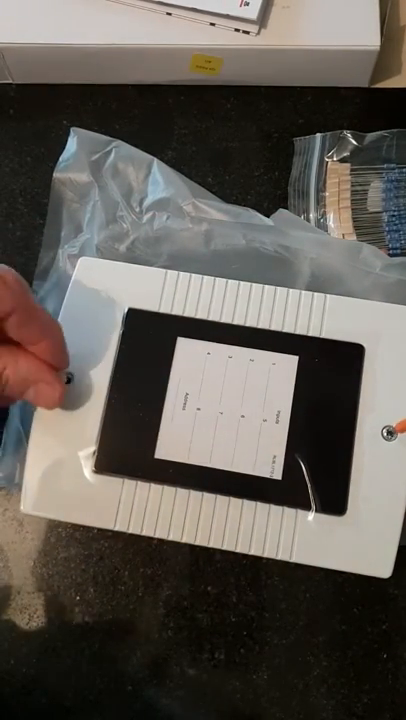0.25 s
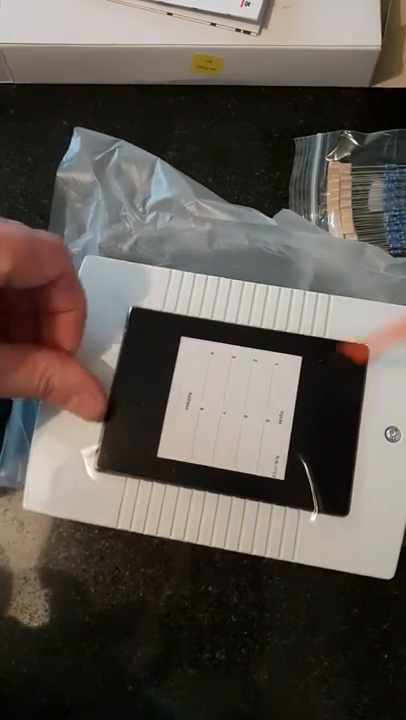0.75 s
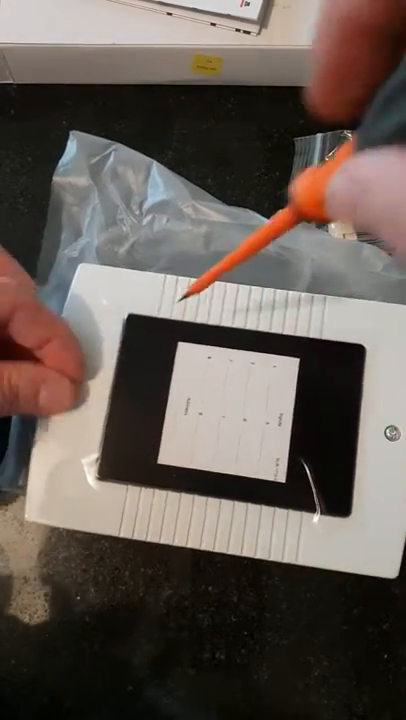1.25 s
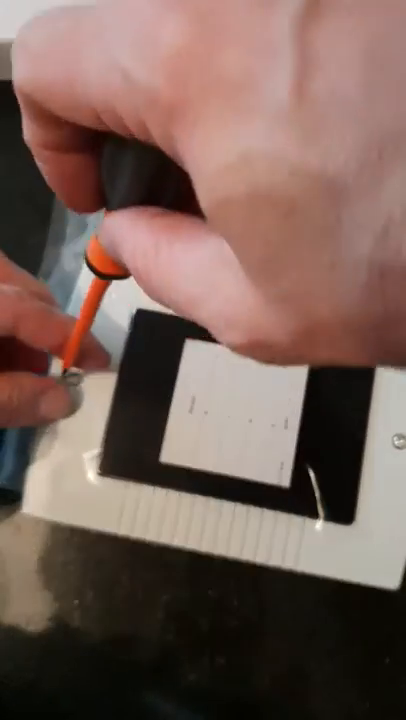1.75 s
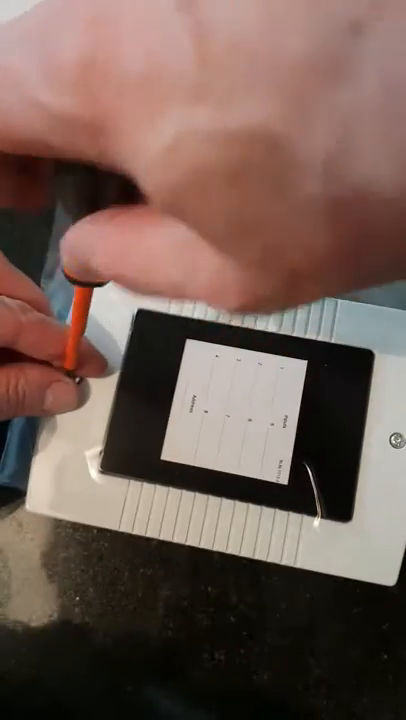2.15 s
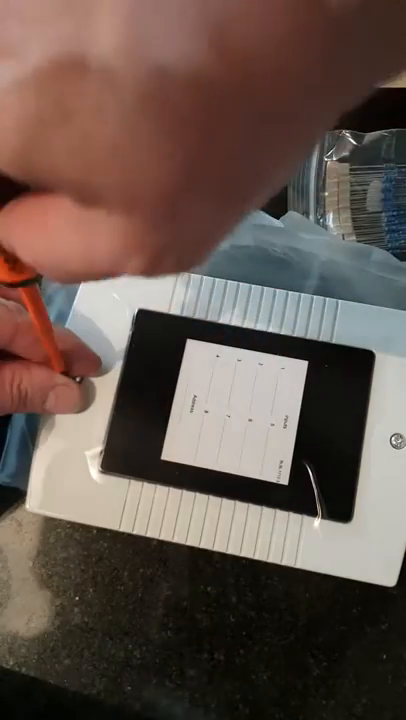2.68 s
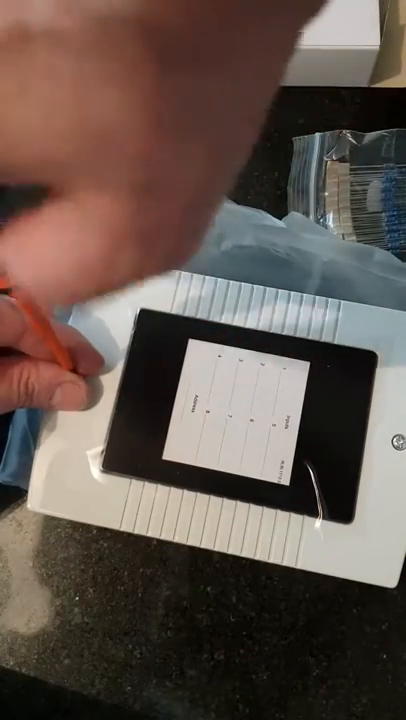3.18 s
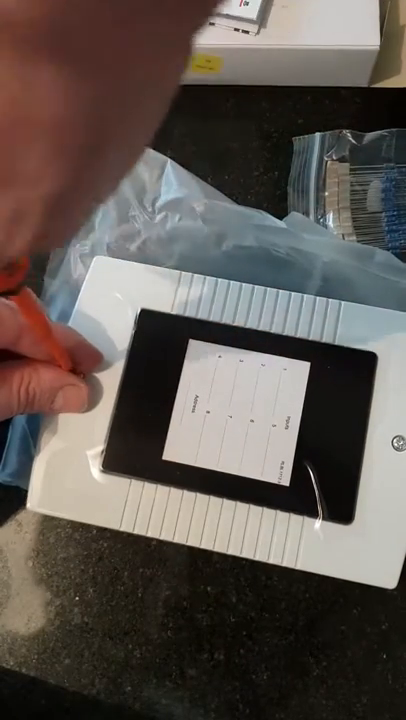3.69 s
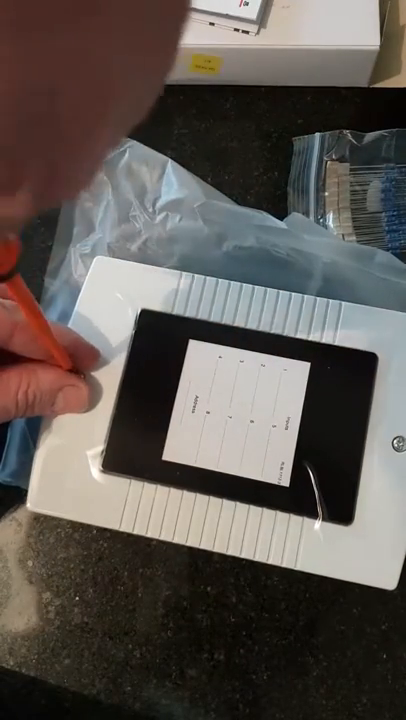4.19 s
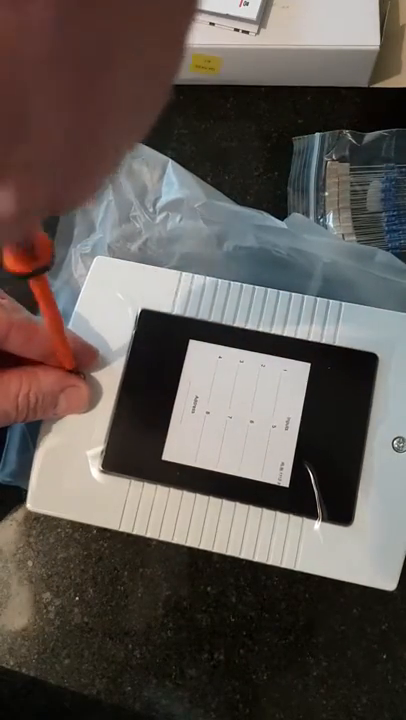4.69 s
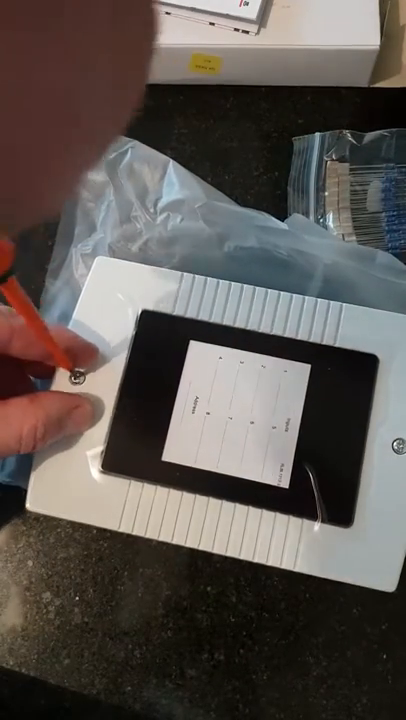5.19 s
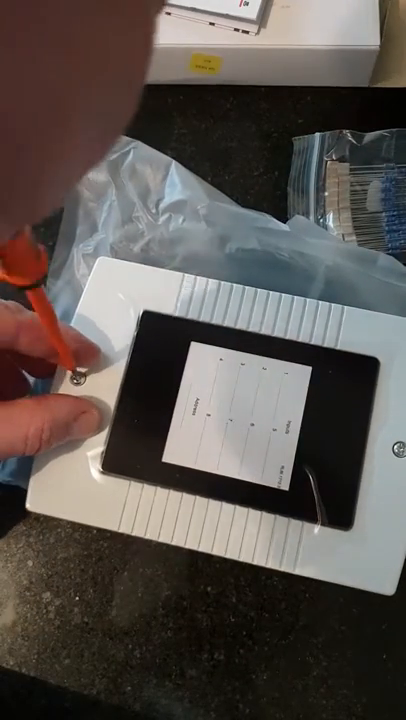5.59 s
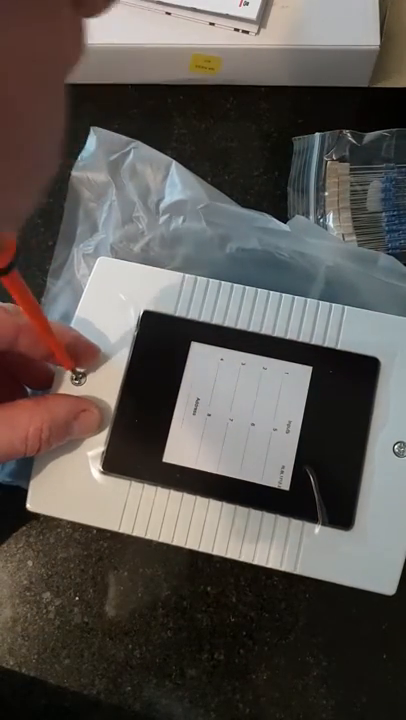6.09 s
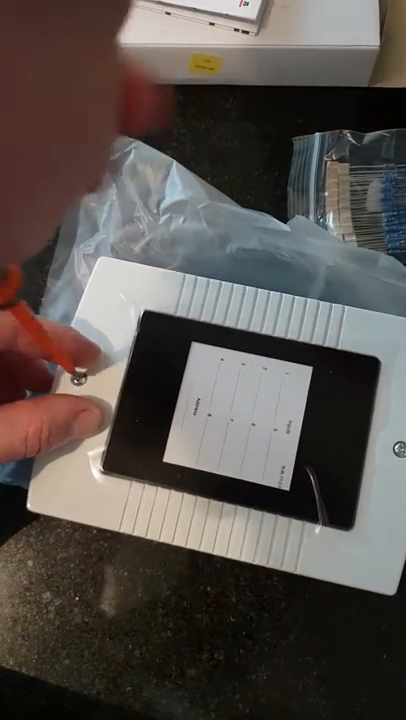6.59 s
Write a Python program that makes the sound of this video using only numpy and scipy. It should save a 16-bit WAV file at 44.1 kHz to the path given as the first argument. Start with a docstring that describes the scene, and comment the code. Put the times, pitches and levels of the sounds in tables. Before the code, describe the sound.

A small screw is driven by hand into a hollow plastic housing, heard close by in a small hard room over faint air noise and a low hum. For the first 0.7 seconds the screw taps lightly on the shell. From about 0.9 to 1.4 seconds the screwdriver is taken up with sharper clicks and tiny metallic pings, while the steadying hand bumps the housing softly. A few more ticks and brief finger slides on the handle follow. Near 2.5 seconds the tip slips off and lands with a knock, the loudest sound, then scrapes faintly and clicks back into the screw head around 3 seconds. After a lull, eight twists run from 3.9 to 6.6 seconds, settling at about three a second, each with small catch and release clicks and a slight hollow ring. The strongest comes near 5.4 seconds. A last twist begins at about 6.8 seconds.

```python
"""A small screw is driven by hand into a plastic housing on a stone worktop, close by in a small hard room.
Over faint air noise and hum, screw and screwdriver tap the shell: each contact cracks and knocks it.
Near 2.5 s the tip slips off, lands with a loud knock and scrapes back into the screw head.
From 3.9 s it clicks through eight twists (catch, seat, release), the housing ringing; a last one begins.
Throughout, fingers slide on the handle now and then and the steadying hand bumps the housing softly."""
import sys
import numpy as np
from scipy import signal
from scipy.fft import rfft, irfft
from scipy.io import wavfile
from scipy.ndimage import uniform_filter1d

SR = 44100
rng = np.random.default_rng(int(sys.argv[2]) if len(sys.argv) > 2 else 0)


def log_audio(samples):
    """Write samples as a 16-bit WAV file to the path given in sys.argv[1]."""
    # one column per channel
    frames = np.atleast_2d(samples).T
    # limit to full scale, then quantise
    limited = np.clip(frames, -1, 1)
    pcm = np.round(limited * 32767).astype(np.int16)
    wavfile.write(sys.argv[1], SR, pcm)


N = 302067
TAP_SAMPLES = 4096
TYPICAL_DB = -42.5   # ordinary contact

# Still air spectrum: f/Hz, rel. density/dB
AIR_SPECTRUM = [(15, -46.5), (25, -3), (59, 8), (130, 5.5), (175, -9), (242, -5), (354, -15.5), (439, -11),
                (545, -13), (1370, -25), (2110, -18.5), (4740, -19), (6560, -24), (14400, -23.5),
                (16000, -32.5)]
# Low hum: f/Hz, level/dB
HUM_BANDS = [(67, -69), (130, -72)]
# Room decay: f/Hz, t60/s
ROOM_DECAY = [(100, 0.19), (300, 0.25), (1000, .33), (4000, 0.36), (9000, 0.38), (15000, 0.23)]
# Room tail spectrum: f/Hz, rel. density/dB
ROOM_SPECTRUM = [(80, -0.5), (250, -3.5), (500, 0.5), (1000, -2), (2500, -1.5), (4300, -2), (7000, -6.5),
                 (14000, 0)]
# Diffuse field: f/Hz, left-right correlation
ROOM_CORRELATION = [(35, 0.96), (120, 0.7), (300, 0.42), (600, .7), (1200, 0.35), (2500, -0.79),
                    (5000, -.1)]
# Long low modes of room and housing: f/Hz, gain/dB, t60/s
BOOM_MODES = [(132.4, -50, 0.42), (194.6, -56.5, 0.54), (234, -58.5, 0.28), (297.1, -61.5, 0.18),
              (433, -62.5, 0.41), (490, -66, 0.18)]
# Low shell modes: f/Hz, rel. level/dB, t60/s
SHELL_MODES = [(138.4, -2.5, 0.18), (216.6, 0.5, 0.061), (294, 4.5, 0.025), (431, -3, 0.051),
               (540, 0.5, .03), (658, -3.5, 0.036), (742.6, -5, 0.082)]
# Damped shell modes under the landing tip: f/Hz, level/dB, t60/s
LANDING_MODES = [(196, -29.5, 0.028), (303, -17, .03), (764, -15.5, 0.03), (1339, -9.5, 0.0087)]
# Bright resonances of shell, screw and shank: f/Hz, width/Hz, nominal boost/dB
RESONANCES = [(1109, 53, 4), (1147, 52, 4.5), (1713, 150, 3.5), (2538, 130, 4), (3770, 150, 2),
              (4245, 260, 2.5), (7600, 280, 2.5), (10800, 590, 1)]
# Crack spectrum per kind of contact: f/Hz, rel. density/dB
SCREW_SPECTRUM = [(450, -20), (800, 0.5), (1600, 0), (3400, -1.5), (4800, -3.5), (6700, -8.5), (10500, -13),
                  (15000, -27.5)]
TOOL_SPECTRUM = [(450, -6), (800, -5.5), (1200, 2), (1900, -2), (3200, 3.5), (4700, 2), (7000, -6.5),
                 (10500, -10.5), (15000, -27)]
SLIP_SPECTRUM = [(450, -6.5), (750, -1.5), (1000, -11), (1400, -5), (1700, -3.5), (1980, -6), (4400, -7.5),
                 (6700, -12.5), (11500, -15), (15000, -29)]
TWIST_SPECTRUM = [(450, -4), (700, 2.5), (1050, -2.5), (1800, -1), (2500, 0.5), (4300, -2), (6300, -7.5),
                  (8800, -12), (11000, -11.5), (15000, -31)]
# Hand against housing: t/s, rel. level/dB, excitation centre/Hz
HAND_BUMPS = [(.532, -34, 178), (.572, -34, 205), (.785, -40.5, 297), (.92, -38, 240), (1.01, -35, 215),
              (1.097, -42.5, 260), (1.25, -43.5, 130), (1.50, -50.5, 210), (1.64, -43.5, 302),
              (2.606, -32.5, 235), (3.306, -52, 254), (3.575, -52.5, 232), (5.895, -43.5, 229.8)]
# Finger slides on the handle: peak t/s, rel. level/dB
FINGER_SLIDES = [(1.876, -59), (2.12, -52), (2.316, -45), (3.33, -70.5), (3.577, -58.5), (3.924, -61),
                 (4.194, -57.5), (4.282, -55), (5.318, -63), (5.83, -51.5)]
# Light screw taps, then catch and seat clicks of a last twist: t/s, level/dB, tilt/(dB/oct)
SCREW_CONTACTS = [(0.0449, -45.5, 6), (0.2067, -43.5, -2.5), (0.3359, -42, 1.5), (0.3942, -50, -2.5),
                  (0.5196, -42.5, 1.1), (0.5593, -41.5, 1), (0.5698, -45, -12), (0.6361, -43, -4),
                  (0.6493, -37.5, -1.3), (1.6393, -38.5, -0.5), (1.7339, -52, 6), (2.08, -43.5, -0.5),
                  (2.1089, -41, 5.5), (4.2012, -53.5, 3), (6.7978, -55.5, -7.5), (6.8327, -46, 6.5)]
# Screwdriver taken up: t/s, level/dB, tilt/(dB/oct)
TOOL_CONTACTS = [(0.8632, -30, 2.5), (0.9009, -38, -1.5), (0.9458, -45.5, -3.5), (1.008, -30.5, 1.5),
                 (1.0356, -39, -2), (1.1733, -43, -1.5), (1.2257, -43.5, 9), (1.2417, -37, -0.1),
                 (1.3594, -51.5, 2.3)]
# Screw or shank ringing: t/s, rel. level/dB, f/Hz
METAL_PINGS = [(0.047, -45, 1570), (1.0364, -42, 2430), (1.242, -31.5, 3040), (1.2425, -38, 3740),
               (2.784, -54.5, 1600)]
# Tip skidding off and reseating: t/s, level/dB
SLIP_CONTACTS = [(2.4264, -31.5), (2.4796, -21), (2.8728, -63.5), (2.9368, -51.5), (2.9965, -44.5),
                 (3.0113, -39.5), (3.031, -37.5)]
# Tip scraping: start/s, end/s, tick level/dB
SCRAPE_SPANS = [(2.435, 2.474, -46), (2.737, 2.99, -69)]
# Twists: catch t/s, catch level/dB, seat level/dB, release t/s, release level/dB,
# shank f/Hz, rel. hand pressure/dB
TWIST_CYCLES = [(3.88, -55, -67, 4.0586, -59, 1730, -8), (4.3784, -41, -51.5, 4.5278, -64.5, 5230, -8),
                (4.7179, -40.5, -59, 4.8663, -58, 2270, -3.5), (5.0555, -55, -50.5, 5.2198, -55.5, 5380, 5),
                (5.3937, -32.5, -48, 5.5416, -42.5, 2470, 3), (5.7271, -35, -53, 5.8909, -50, 2194, -6),
                (6.086, -38, -55, 6.2422, -47, 5500, -3.5), (6.4287, -41.5, -59.5, 6.577, -49.5, 2190, 0.5)]


def from_db(db):
    """Decibels to gain."""
    return 10 ** (np.asarray(db) / 20)


def at_hz(points, hz):
    """Interpolate a table over log frequency."""
    f_hz, value = np.transpose(points)
    return np.interp(np.log(np.maximum(hz, 1)), np.log(f_hz), value)


def fade(t, t60_s):
    """Exponential decay, -60 dB at t60_s."""
    return np.exp(-np.log(1000) * t / t60_s)


def unit_level(x):
    """Scale to the energy of 10 ms at rms 1."""
    return x / np.sqrt(np.mean(np.sum(x ** 2, axis=-1)) / (.01 * SR))


def add(out, t_s, sound):
    """Mix a sound in at t_s."""
    i = int(round(t_s * SR))
    out[:, i:i + sound.shape[-1]] += sound[..., :N - i]


def pan(pan_db):
    """Stereo gains, left over right by pan_db."""
    return from_db(np.array([[pan_db], [-pan_db]]) / 2)


def follow(level_db, usual_db, slope):
    """Driven level/dB: usual level plus slope times the contact's excess."""
    return usual_db + slope * (level_db - TYPICAL_DB)


def minimum_phase(gain_db):
    """Causal frequency response with the given gains."""
    cepstrum = irfft(np.log(from_db(gain_db)))
    half = len(cepstrum) // 2
    cepstrum[1:half] *= 2
    cepstrum[half + 1:] = 0
    return np.exp(rfft(cepstrum))


def diffuse(size, spectrum):
    """Stereo noise from all round; left-right correlation varies with frequency."""
    hz = np.fft.rfftfreq(size, 1 / SR)
    mid, side = rfft(rng.standard_normal((2, size)))
    alike = np.clip(at_hz(ROOM_CORRELATION, hz), -1, 1)
    pair = np.sqrt((1 + alike) / 2) * mid + np.sqrt((1 - alike) / 2) * side * [[1], [-1]]
    return irfft(pair * from_db(at_hz(spectrum, hz)), size)


def air():
    """Faint steady noise with a wavering low hum."""
    noise = diffuse(N, AIR_SPECTRUM)
    out = from_db(-64) * noise / noise.std()
    for hz, db in HUM_BANDS:
        hum = signal.lfilter(*signal.iirpeak(hz, Q=9, fs=SR), rng.standard_normal(N + SR))[SR:]
        out += from_db(db) * hum / hum.std()
    return out * pan(1.5)


def room(x, wet_db, build_s):
    """Near walls answer within milliseconds; the tail dies band by band, low modes boom on."""
    t, hz = np.arange(SR) / SR, np.fft.rfftfreq(SR, 1 / SR)
    noise = rfft(diffuse(SR, ROOM_SPECTRUM))
    centres_hz = np.geomspace(100, 15000, 8)
    tail = 0
    for centre_hz, pick in zip(centres_hz, np.eye(len(centres_hz))):
        band = irfft(noise * at_hz(list(zip(centres_hz, pick)), hz), SR)
        tail = tail + band * fade(t, at_hz(ROOM_DECAY, centre_hz))
    tail *= 1 - np.exp(-(t / build_s) ** 2)
    tail = from_db(wet_db) * tail / np.sqrt(np.sum(tail ** 2) / 2)
    booms = sum(from_db(db) * np.sin(2 * np.pi * f * t) * fade(t, t60) for f, db, t60 in BOOM_MODES)
    return signal.fftconvolve(x, tail + booms, axes=1)[:, :N]


def finger_slides(grain_db, gain_db, sigma_s):
    """Skin on the handle: a hiss of tiny slips that swells and fades."""
    t = np.arange(N) / SR
    strokes = sum(from_db(db) * np.exp(-((t - t_s) / sigma_s) ** 2 / 2) for t_s, db in FINGER_SLIDES)
    hiss = diffuse(N, [(200, -22), (1000, -16.5), (2000, -12.5), (3000, 0.5),   # f/Hz, rel. density/dB
                       (4500, -2), (7000, -8.5), (11000, -11.5), (16000, -25)])
    grain = uniform_filter1d(rng.standard_normal(N), size=60)
    hiss *= from_db(grain_db * grain / grain.std())
    return from_db(gain_db) * strokes * hiss / hiss.std()


def shell_knock(centre_hz, width_oct, rise_s):
    """Low shell modes; contact firmness favours those near centre_hz."""
    t = np.arange(TAP_SAMPLES) / SR
    hz, db, t60_s = np.transpose(SHELL_MODES)[:, :, None]
    offset_oct = np.log2(hz / max(centre_hz, 100))
    weight = from_db(db + rng.normal(0, 1, hz.shape)) / (1 + (offset_oct / width_oct) ** 2)
    signs = -(-1) ** np.arange(len(SHELL_MODES))[:, None]
    modes = signs * weight * np.sin(2 * np.pi * hz * t) * fade(t, t60_s)
    return unit_level(modes.sum(0) * (1 - np.exp(-t / rise_s)))


def bumps(table, flesh_loss_db=3.5):
    """Soft flesh wakes the lowest modes slowly and damps what it pushes."""
    out = np.zeros((2, N))
    for t_s, db, centre_hz in table:
        add(out, t_s, from_db(db - flesh_loss_db) * shell_knock(centre_hz, width_oct=0.5, rise_s=0.0077))
    return out


def steadying_hand(fidgets_per_s):
    """The hand bumps the housing and shifts faintly at random."""
    gap, size, pitch = rng.random((60, 3)).T
    t_s = np.cumsum(.5 + gap) / fidgets_per_s
    fidgets = np.column_stack([t_s, -61 + 8 * (size - .5), 236 * 2 ** (pitch - .5)])
    return bumps(HAND_BUMPS) + bumps(fidgets[t_s < N / SR])


def pings(table, t60_s, gain_db):
    """A close pair of metal modes, damped by the grip."""
    out, t = np.zeros((2, N)), np.arange(TAP_SAMPLES) / SR
    for t_s, db, hz in table:
        lower_hz = hz * rng.uniform(.9, .96, (2, 1))
        pair = np.sin(2 * np.pi * hz * t) + 0.74 * np.sin(2 * np.pi * lower_hz * t)
        add(out, t_s, from_db(db + gain_db) * unit_level(pair * fade(t, t60_s)))
    return out


def hollow_ring(table, base_hz, bend, t60_s, gain_db):
    """The hollow housing rings; pitch creeps up as the hand presses on."""
    out, t = np.zeros((2, N)), np.arange(SR // 4) / SR
    attack, decay = 1 - np.exp(-t / 0.0057), fade(t, t60_s)
    for t_s, pressure_db in table:
        start_hz = base_hz * rng.uniform(0.96, 1.05)
        pitch_hz = start_hz * (1 + bend * rng.uniform(0.55, 1) * (1 - decay))
        ring = np.sin(2 * np.pi * np.cumsum(pitch_hz) / SR) * attack * decay
        add(out, t_s, from_db(gain_db + pressure_db) * ring * pan(5))
    return out


def contacts(table, spectrum, crack_t60_s, rebound, ring_db, creep_db,
             knock_db, knock_slope, knock_hz, width_oct, pan_db, spread):
    """Creep, snap and rattle: a dense crack of plastic modes, a short ring, a knock of the shell."""
    out, lead_s = np.zeros((2, N)), .015
    t, hz = np.arange(TAP_SAMPLES) / SR - lead_s, np.fft.rfftfreq(TAP_SAMPLES, 1 / SR)
    peaks_db = np.array([db / (1 + (2 * (hz - f) / width) ** 2) for f, width, db in RESONANCES])
    body_db = at_hz(spectrum, hz) - 10 * np.log10(1 + (420 / (hz + 20)) ** 4)
    treble_oct = np.log2(np.maximum(hz, 700) / 3000)
    decay = fade(abs(t), crack_t60_s) + from_db(ring_db) * fade(abs(t), t60_s=0.037)
    side_share = np.clip(spread * hz / (hz + 2200), 0, 1)   # short waves differ left to right
    for t_s, level_db, tilt_db_oct in table:
        # light contacts creep first; hard ones let go at once
        creep = from_db(min(follow(level_db, creep_db, slope=-2.1), -8)) * fade(abs(t), t60_s=0.026)
        snaps_s = np.cumsum([0, *rng.uniform(0.00045, 0.0061, size=2)])   # snap, two rebounds
        rattle = sum(rebound ** k * (t >= at) * fade(abs(t - at), t60_s=0.0018)
                     for k, at in enumerate(snaps_s))
        mid, side = rfft(rng.standard_normal((2, TAP_SAMPLES)) * np.where(t < 0, creep, decay + rattle))
        pair = np.sqrt(1 - side_share) * mid + np.sqrt(side_share) * side * [[1], [-1]]
        noise_db = 10 * np.log10(uniform_filter1d(np.mean(abs(pair) ** 2, axis=0), size=90))
        spot_db = rng.uniform(0, 1.65, len(RESONANCES)) @ peaks_db   # each spot favours other resonances
        crack = irfft(pair * minimum_phase(body_db + spot_db - noise_db + tilt_db_oct * treble_oct))
        add(out, t_s - lead_s, from_db(level_db) * unit_level(crack) * pan(pan_db))
        knock = shell_knock(knock_hz * rng.uniform(.88, 1.085), width_oct, rise_s=0.00033)
        add(out, t_s, from_db(follow(level_db, knock_db, knock_slope)) * knock * pan(pan_db / 2))
    return out


def handling():
    """Light screw taps, the screwdriver taken up, and the catch and seat of a last twist."""
    screw = contacts(
        SCREW_CONTACTS, SCREW_SPECTRUM, crack_t60_s=0.03, rebound=1.1, ring_db=-16.5, creep_db=-16.5,
        knock_db=-50, knock_slope=.7, knock_hz=350, width_oct=0.89, pan_db=-1, spread=0.64)
    tool = contacts(
        TOOL_CONTACTS, TOOL_SPECTRUM, crack_t60_s=0.021, rebound=0.83, ring_db=-7, creep_db=-8,
        knock_db=-51, knock_slope=0.91, knock_hz=335, width_oct=0.62, pan_db=-1.5, spread=0.41)
    return screw + tool + pings(METAL_PINGS, t60_s=0.018, gain_db=-3.5)


def slipping(ticks_per_s, slip_tilt_db_oct, tick_tilt_db_oct):
    """The tip jumps out, scrapes over the shell in dull ticks and is worked back in."""
    slips = [(t_s, db, slip_tilt_db_oct) for t_s, db in SLIP_CONTACTS]
    ticks = [(t_s + rng.uniform(-0.3, .4) / ticks_per_s, db + rng.normal(0, 1.7), tick_tilt_db_oct)
             for start_s, end_s, db in SCRAPE_SPANS for t_s in np.arange(start_s, end_s, 1 / ticks_per_s)]
    clicks = contacts(
        slips + ticks, SLIP_SPECTRUM, crack_t60_s=0.018, rebound=1, ring_db=-19.5, creep_db=-17.5,
        knock_db=-44.5, knock_slope=1.015, knock_hz=347, width_oct=0.6, pan_db=-1, spread=0.17)
    presses = [(t_s, 0) for t_s, _ in SLIP_CONTACTS]
    return clicks + hollow_ring(presses, base_hz=400, bend=0.15, t60_s=0.15, gain_db=-47.5)


def landing(t_s):
    """The tip lands with the hand's weight behind it, driving the shell into the worktop."""
    out, t = np.zeros((2, N)), np.arange(TAP_SAMPLES) / SR
    modes = sum(from_db(db) * np.sin(2 * np.pi * hz * t) * fade(t, t60) for hz, db, t60 in LANDING_MODES)
    add(out, t_s, -modes)
    return out


def twisting(seat_delay_s, grit_span_s):
    """The tip catches, seats and lets go as the wrist turns back; the freed shank rings."""
    catch_s, catch_db, seat_db, release_s, release_db, shank_hz, pressure_db = np.transpose(TWIST_CYCLES)
    seat_s = catch_s + seat_delay_s
    catches = zip(catch_s, catch_db, -0.9 - 0.27 * pressure_db)   # a loaded tip is duller
    seats = [(t_s, db, 0) for t_s, db in zip(seat_s, seat_db)]
    grit = [(t_s + grit_span_s * share, rng.normal(-64, 3), 0)   # the thread cuts in tiny ticks
            for t_s in catch_s for share in rng.random(size=4)]
    releases = zip(release_s, release_db, 3 + 3 * np.log2(shank_hz / 3000))   # higher ring, brighter click
    out = contacts(
        catches, TWIST_SPECTRUM, crack_t60_s=0.019, rebound=1.1, ring_db=-9, creep_db=-6,
        knock_db=-45.5, knock_slope=0.43, knock_hz=382, width_oct=0.75, pan_db=1, spread=0.73)
    out += contacts(
        seats + grit, TWIST_SPECTRUM, crack_t60_s=0.02, rebound=1, ring_db=-10.5, creep_db=-23,
        knock_db=-45, knock_slope=0.82, knock_hz=334, width_oct=0.83, pan_db=2, spread=0.79)
    out += contacts(
        releases, TWIST_SPECTRUM, crack_t60_s=0.017, rebound=0.73, ring_db=-11, creep_db=-16,
        knock_db=-41.5, knock_slope=0.54, knock_hz=291, width_oct=1, pan_db=3, spread=0.8)
    out += hollow_ring(zip(catch_s, pressure_db), base_hz=365, bend=0.301, t60_s=0.16, gain_db=-42)
    out += hollow_ring(zip(release_s, pressure_db), base_hz=411, bend=0.32, t60_s=0.13, gain_db=-47)
    out += pings(zip(release_s, release_db, shank_hz), t60_s=0.036, gain_db=-4.5)
    # a hard twist pushes the housing against the hand
    pushes = [(t_s, follow(db, usual_db=-60, slope=2.3), 236) for t_s, db in zip(seat_s, catch_db)]
    return out + bumps(pushes)


def scene():
    """All contacts share one room; the loud landing stays mostly dry, with little room tail."""
    background = air()
    close = handling()
    close += slipping(ticks_per_s=150, slip_tilt_db_oct=-2.5, tick_tilt_db_oct=-4)
    close += twisting(seat_delay_s=.04, grit_span_s=.22)
    close += finger_slides(grain_db=2.5, gain_db=2.5, sigma_s=.018)
    close += steadying_hand(fidgets_per_s=3.5)
    low_cut = signal.butter(4, 134, "high", fs=SR, output="sos")   # close sounds and landing carry little below 134 Hz
    close, blow = signal.sosfilt(low_cut, np.array([close, landing(t_s=2.48)]) + 1e-18)
    return background + close + blow + room(close + .3 * blow, wet_db=-2.5, build_s=0.0046)


def record(dry):
    """Steep low-pass at 16.2 kHz."""
    return signal.sosfilt(signal.ellip(10, .1, 80, 16200, fs=SR, output="sos"), dry)


dry = scene()
out = record(dry)
log_audio(out)
```